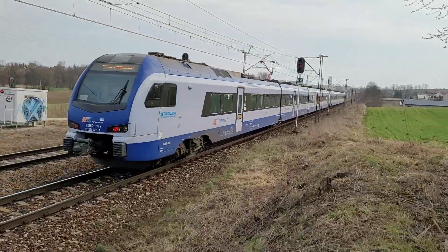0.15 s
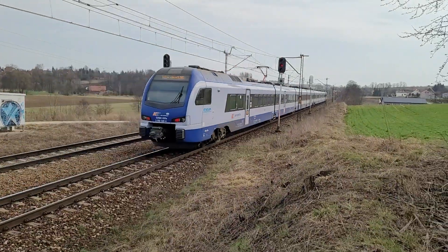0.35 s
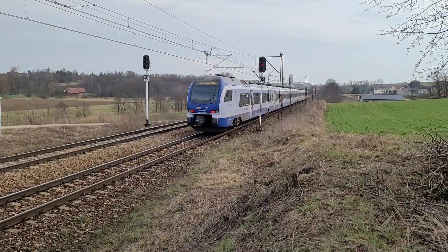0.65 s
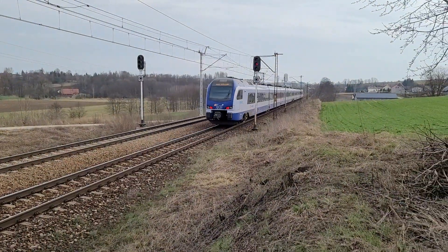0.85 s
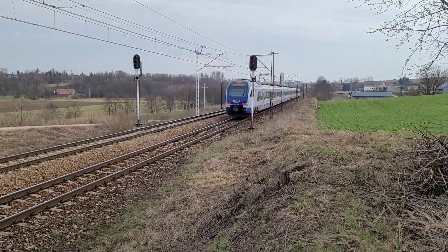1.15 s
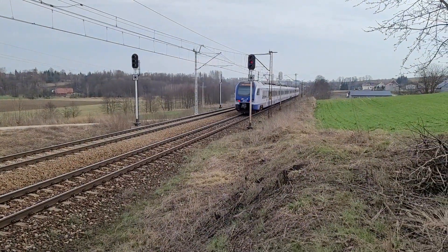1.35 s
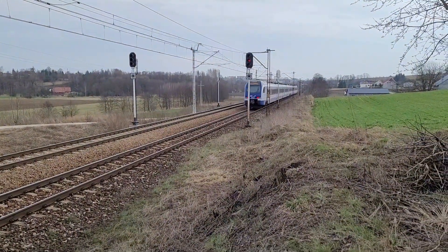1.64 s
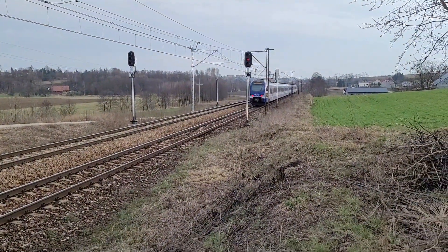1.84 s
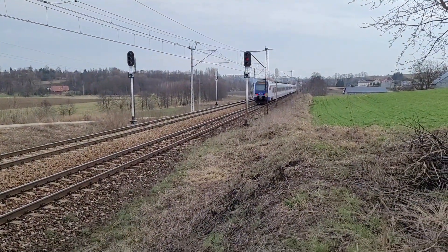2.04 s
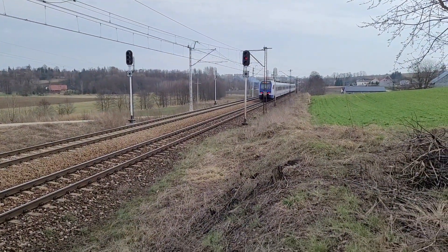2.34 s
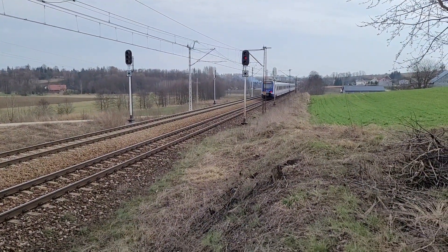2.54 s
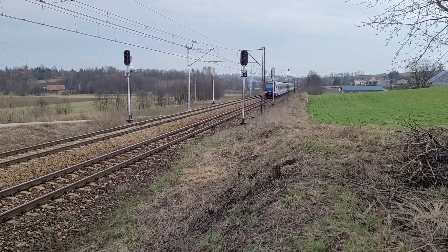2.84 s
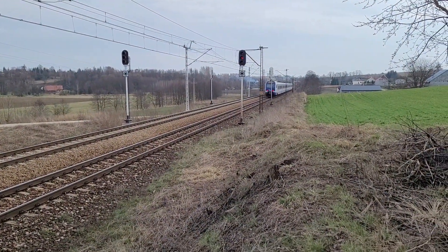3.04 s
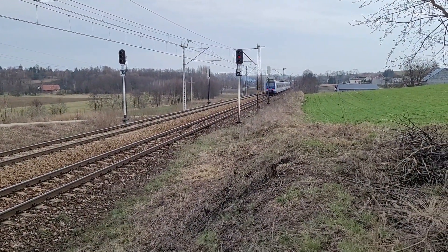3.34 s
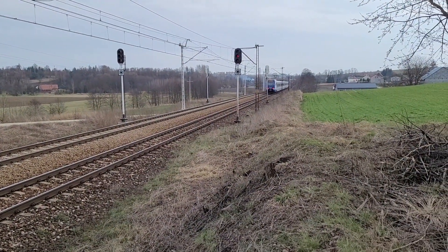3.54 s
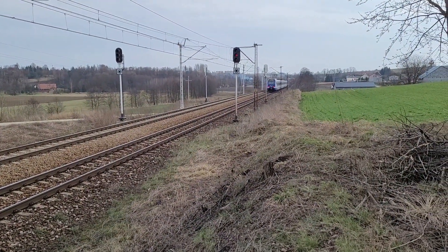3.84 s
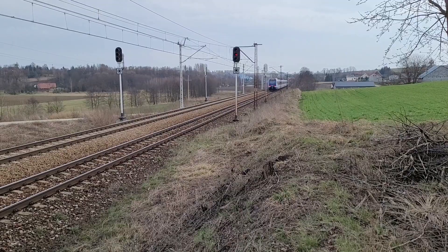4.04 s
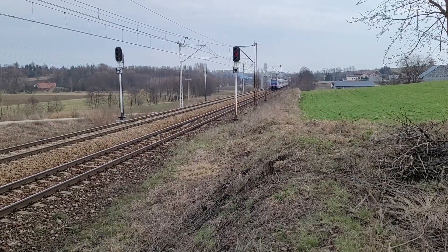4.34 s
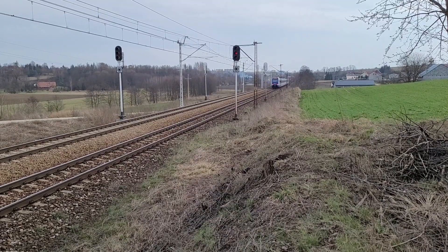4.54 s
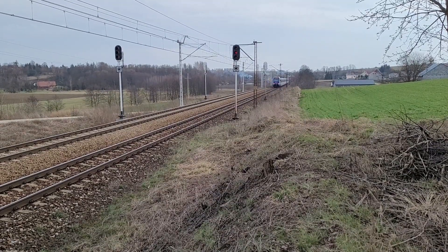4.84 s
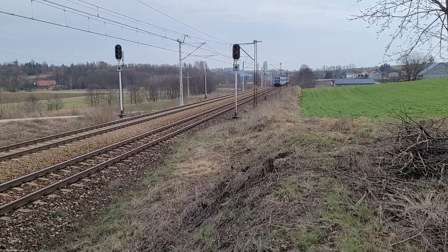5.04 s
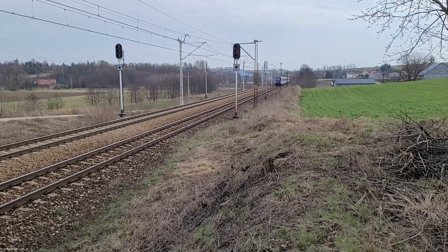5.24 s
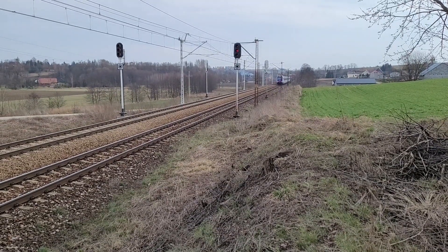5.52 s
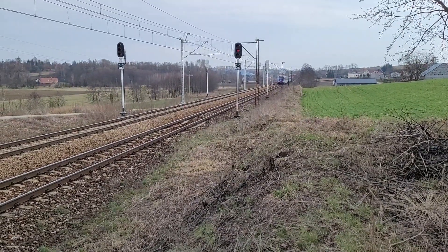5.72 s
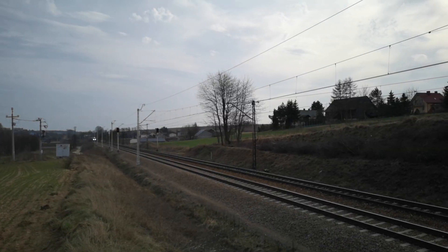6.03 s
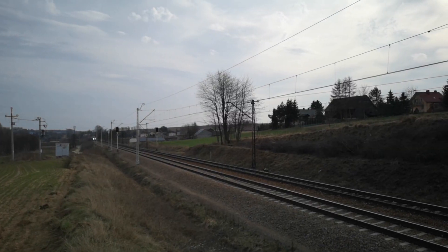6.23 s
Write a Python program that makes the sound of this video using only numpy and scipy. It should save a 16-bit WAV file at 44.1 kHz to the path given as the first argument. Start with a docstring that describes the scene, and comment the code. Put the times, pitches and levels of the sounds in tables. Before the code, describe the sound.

Loud rail roar, metallic wheel hum and airy rush open the scene and shrink into the distance over thin hiss. Low, lumpy gusts and sharp puffs buffet an unprotected hand-held microphone, jumping between sides. After one violent thump the level drops; smaller flutters and a soft far-off drone remain. The sound breaks off, then returns briefly in a windier open spot.

```python
"""Rails hum, wheels ring and air rushes as an electric train that has just passed rolls away over open fields:
bands of noise that fade, over a background hiss. Gusts thump on the two ports of a hand-held microphone, each
port largely on its own: noise bursts and single puffs. After the strongest gust all is quieter and a faint
distant drone grows; near the end the sound breaks off and comes back in another, windier spot."""
import sys
import numpy as np
from scipy import signal
from scipy.fft import rfft, irfft
from scipy.io import wavfile
from scipy.ndimage import uniform_filter1d

SR = 44100
rng = np.random.default_rng(int(sys.argv[2]) if len(sys.argv) > 2 else 0)


def unload_wav(signal):
    """Save mono or channel-first audio to the path in sys.argv[1] as 16-bit WAV at rate SR, clipped to [-1, 1]."""
    wavfile.write(
        sys.argv[1],
        SR,
        np.round(np.clip(np.atleast_2d(signal).T, -1, 1) * 32767).astype(np.int16),
    )


N = 281358

# Spectra of the three train roars, relative density: f/Hz, level/dB
RAIL_SPECTRUM = [(190, -37.5), (330, -16), (471, -10), (560, -9.5), (688, -2.5), (827, -6.5), (981, -0.5),
                 (1180, -10.5), (1500, -14), (1950, -39.5), (3300, -120)]
WHEEL_SPECTRUM = [(710, -50.5), (1200, -11.5), (1710, 1), (1910, 4), (2130, -1.5), (2580, -3.5),
                  (2720, -10), (4160, -35), (7040, -120)]
RUSH_SPECTRUM = [(1650, -19), (2700, -6.5), (3000, -6.5), (3400, -6.5), (4560, -3), (5240, -3),
                 (6180, -13.5), (8350, -9), (9180, -18.5), (12000, -23), (15600, -31)]
# Background hiss of field and microphone, coloured by the microphone, relative density: f/Hz, level/dB
HISS_SPECTRUM = [(2900, -11), (3400, -5.5), (5200, -6.5), (5750, -4), (6150, -21.5), (6620, -1), (7200, -2),
                 (7500, -19.5), (9300, -9), (9600, -4), (11000, -10), (12000, -6.5), (13200, -19),
                 (14300, -16), (14900, -29), (15600, -28.5)]
# Rail, wheel, air rush, background hiss: first level/dB, loss per doubling of distance/dB, lingering level/dB
FADES = [(-28.5, 7.5, -45), (-32.5, 14, -51.5), (-38.5, 10.5, -76), (-50, 4.5, -58)]
# Wavering of rail and wheel together: t/s, level change/dB
ROAR_WAVERS = [(0, -0.5), (.26, 1.5), (.4, 1), (1.2, 1.5), (2, -1), (2.6, -0.5), (3.2, -0.8), (3.85, 1),
               (4.1, -1.5), (4.6, -2.5), (5.75, -0.5)]
# Narrow resonances of rails and wheels: f/Hz, full width at half amplitude/Hz,
# level over the rail fade when near/dB, the same when far/dB
RINGS = [(355, 58, -5, -31), (467, 74, -6, -13), (692, 70, -3, -8.5), (918, 91, -6.5, -8),
         (1027, 150, -8.5, 0.5), (1303, 230, -10, -4), (1471, 90, -9, -15.5), (1877, 230, -10.5, -25),
         (2400, 310, -14.5, -26.5)]
# Likeness of the two channels: f/Hz, power share common to both (0-1), left minus right/dB,
# the same after the strongest gust/dB
CHANNELS = [(515, 0.82, 4.5, 1), (694, 0.83, -0.5, -1.5), (895, 0.86, 1, 1.5), (990, 0.8, 1.5, 0),
            (1310, 0.59, 6.5, 3), (1558, .35, 2, -1), (2176, 0.58, 3, 0.5), (3650, 0.26, 2.5, 2),
            (7300, 0.1, 1, 0.5), (7930, 0, 9, 6), (11430, 0.12, 10, 7), (12800, .7, 7.5, 11)]
# Phase between the channels, nearly alike again at the top: f/Hz, lead of the left/rad
LEFT_LEADS = [(0, 0), (430, 1.0), (600, .6), (690, .9), (1030, 2.9), (1400, 2.9), (2070, 6.3), (2700, 6.6),
              (3800, 12.4), (4300, 11.8), (5500, 14.4), (7000, 4 * np.pi), (16000, 4 * np.pi)]
# Steady wind under the gusts: t/s, left thud level/dB, right thud level/dB, flutter over thud/dB
BREEZE = [(0, -29, -35, -5), (.5, -36.5, -28, -7.5), (1.0, -32, -31, -4.5), (1.75, -40, -24, -7.5),
          (1.9, -44.5, -40, -20), (3.05, -40.5, -39.5, -12.5), (3.45, -31, -42, -4.5),
          (3.8, -43.5, -48, -11), (4.3, -50, -47.5, -3.5), (5.75, -46, -48, -8)]
# Gusts: t of top/s, length/s, thud level of the louder port at the top/dB, left minus right/dB, flutter over thud/dB
GUSTS = [(0.22, 0.27, -19.5, 7, -1.5), (0.524, 0.071, -33, -15, -2), (0.652, 0.14, -21, -25, -3.5),
         (0.704, 0.14, -20, -8.5, 1), (0.768, 0.081, -11.5, -21, -4), (0.853, 0.14, -19.5, -14, 2),
         (1.132, 0.11, -20.5, 3.5, -3), (1.406, 0.12, -25.5, 19, -27), (1.783, 0.16, -28.5, -27, 3),
         (1.976, 0.084, -32, 18, -6), (2.089, 0.069, -27, 24, -7.5), (2.429, 0.14, -25.5, -7, -4),
         (2.768, 0.027, -33, -8, -4), (2.87, 0.041, -30, -17, -15), (3.176, 0.066, -23, 30, 2),
         (3.25, 0.087, -17.5, 29, -5), (3.341, 0.2, -14.5, 24, -2.5), (3.369, 0.085, -20.5, 2, 4),
         (3.494, 0.098, -28.5, -19, -6), (3.575, 0.053, -42, 0, 12.5), (3.636, 0.12, -33, -3, -3.5),
         (4.256, 0.11, -38, 1, -21), (4.38, 0.13, -30.5, 6, -2.5), (4.506, 0.32, -39, 0, -3.5),
         (4.607, 0.16, -37.5, 4, -6.5), (4.776, 0.19, -35.5, 26, -3.5), (4.97, 0.14, -26, 4.5, -1),
         (5.165, 0.13, -29, 4.5, 0), (5.262, 0.11, -34.5, -24, -8.5), (5.437, 0.06, -36, -1, -3),
         (5.513, 0.17, -33, 12, 1), (5.687, 0.21, -36.5, 9, 6.5), (5.73, 0.093, -31, 6, 2.5)]
# Brief dips of the wind (a negative drop is a rise): t of middle/s, length/s, left drop/dB, right drop/dB
LULLS = [(0.812, 0.031, 8, 10.5), (4.08, 0.094, 27, -2.5), (4.782, 0.3, -5, 14), (5.384, 0.074, 6, 36)]
# Spectra of the wind on a port, relative density: f/Hz, level/dB; the flutter's f is scaled in each spot
THUD_SPECTRUM = [(12, -44), (22, -15.5), (43, 5.5), (64, 10), (135, -1.5), (176, -11.5), (200, -20),
                 (260, -44), (440, -120)]
FLUTTER_SPECTRUM = [(70, -44), (130, 4), (200, -4), (260, 0), (330, -6), (430, -12.5), (800, -29),
                    (1100, -51), (1800, -120)]
# Single strong puffs: t/s, peak level of the louder port before the push/dB, mean pitch f/Hz,
# left minus right/dB, push on the membrane (signed factor: in positive, out negative)
PUFFS = [(0.081, -10, 120, -13, -1.4), (0.14, -18, 150, 27, 0.72), (0.194, -13, 147, 20, 0.88),
         (0.236, -18, 150, -16, 1), (0.61, -9, 100, -27, 0.89), (0.732, -11, 99, -9, 0.87),
         (0.753, -15, 90, -25, -0.82), (0.85, -12, 80, -13, 0.96), (0.984, -16, 199, 10, 1),
         (1.135, -10.5, 71, -5, 1), (1.27, -20, 90, -25, -0.77), (2.435, -16, 110, -20, -1.2),
         (3.171, -14, 133, 34, 1), (3.248, -18, 110, 34, 1), (3.281, -11, 132, 23, 1),
         (3.3, -15, 110, -25, -1), (3.312, -6, 151, 24, 0.93), (3.327, -12, 129, -8, 0.94),
         (3.351, 0.5, 149.3, 22, 0.6), (3.367, -12, 220, -19.5, -1.1), (3.372, -7.5, 150, -15, 0.96),
         (3.391, -2.5, 180, 24, 0.93), (3.434, -13.5, 85, 30, -0.95), (3.871, -29, 170, 1.5, -1.06),
         (3.911, -31, 90, -1, -1), (3.997, -27, 71, -3, -0.96), (4.764, -23, 78, 29, 0.69),
         (4.793, -28, 126, 24, -0.95), (4.968, -21.5, 116, -2, -0.9), (4.993, -26, 142, 19, -1),
         (5.15, -24.5, 254, 4, -1.16), (5.173, -22, 99, 25, -1.16), (5.593, -23, 146, -3, 1),
         (5.682, -21.5, 253, -10, -1.1), (5.702, -24, 230, -15, -1), (5.743, -23, 130, 25.5, 0.74),
         (5.744, -23, 147, -26, -1), (6.266, -13, 54.4, 3, -1), (6.295, -13.5, 200, 9, 1),
         (6.321, -12.5, 182, 13, -1.04), (6.354, -12, 147.8, 5, 1)]
# Distant drone, relative density: f/Hz, level/dB
DRONE_SPECTRUM = [(380, -28.5), (520, -5.5), (700, 1), (880, -2), (1100, -8.5), (1550, -16.5),
                  (2100, -16.5), (2900, -29.5), (4200, -49)]
# Growth of the drone: t/s, level/dB
DRONE_LEVEL = [(3.3, -64), (4.3, -55), (4.85, -49), (5.15, -45), (5.75, -46)]
# Wind in the second spot, alike on both ports: t/s, thud level/dB, flutter level/dB
WIND_AFTER = [(6.2, -25, -35), (6.23, -23, -32), (6.264, -22.5, -39), (6.29, -22.5, -23), (6.33, -18, -25),
              (6.38, -34.5, -34)]
# Field noise of the second spot, relative density: f/Hz, level/dB
FIELD_SPECTRUM = [(450, -32), (700, 6), (1100, 5), (1700, 4.5), (2600, -7.5), (4000, -22), (8000, -25.5),
                  (15500, -31)]

DOUBLING_S = 1.0  # time the train takes to double its first distance
FAR_S = 1.82  # time over which the balance of rings and rail roar turns from near to far
RING_WANDER, RING_WANDER_HZ = 0.015, 3.0  # rms stray as a share of pitch; corner of its slow noise
TURN_DOWN_S, TURN_DOWN_DB = (3.27, 3.54), 6  # the level is turned down between these times, by this much
GUST_EDGE_DB, GUST_RISE = 17, 0.55  # fall from top to either end; share of the length spent rising
LULL_EDGE_S = 0.023
PUFF_SLOWING = 1.83  # the swing after the snap is this many times slower than the one before
DRONE_SHARE = 0.94  # power share common to both ports
BREAK_S = (5.75, 6.195)  # silence from, to
FIELD_DB = -55
CUTOFF_HZ, CEILING = 15720, 0.95  # top of the passband; amplitude the membrane cannot exceed


def from_db(db):
    """Level as amplitude gain: 20 dB are a factor of ten."""
    return 10 ** (np.asarray(db) / 20)


def rms_one(x):
    """Normalization to unit rms, the reference of every noise level."""
    return x / np.sqrt(np.mean(x ** 2) + 1e-20)


def in_time(rows):
    """Linear interpolation of a table's columns, one value per sample."""
    s, *columns = np.transpose(rows)
    t = np.arange(N) / SR
    return [np.interp(t, s, column) for column in columns]


def at_hz(points, column=1):
    """Interpolation along log frequency, one value per bin."""
    hz = np.maximum(np.fft.rfftfreq(N, 1 / SR), 1)
    table = np.array(points)
    return np.interp(np.log(hz), np.log(table[:, 0]), table[:, column])


def drift(corner_hz):
    """Random modulation of unit rms: white noise through two equal low-pass poles."""
    step = 40  # samples between slow values
    pole = np.exp(-2 * np.pi * corner_hz * step / SR)
    white = rng.standard_normal(N // step + 2002)
    slow = signal.lfilter([1], [1, -2 * pole, pole * pole], white)[2000:]
    return np.interp(np.arange(N) / step, np.arange(len(slow)), rms_one(slow))


def coloured(bins, spectrum):
    """Spectral shaping: noise bins weighted by a spectrum, returned at unit rms."""
    return rms_one(irfft(bins * from_db(at_hz(spectrum)), N))


def shared(common, own, share):
    """Partial coherence: powers of common and own noise add up to a constant."""
    return np.sqrt(share) * common + np.sqrt(1 - share) * own


def channel_noise():
    """Coherence by frequency: a common part, phase-shifted in the right channel, plus noise of each channel's own."""
    common, left, right = rfft(rng.standard_normal((3, N)))
    share = np.clip(at_hz(CHANNELS), 0, 1)
    lead = np.interp(np.fft.rfftfreq(N, 1 / SR), *np.transpose(LEFT_LEADS))
    lean = from_db(at_hz(CHANNELS, column=2) / 2)
    return np.array([shared(common, left, share) * lean,
                     shared(common * np.exp(-1j * lead), right, share) / lean])


def fading():
    """Spreading loss: levels fall per doubling of distance to what lingers; later all four are turned down."""
    t = np.arange(N) / SR
    doublings = np.log2(1 + t / DOUBLING_S)
    turn_down_db = np.interp(t, TURN_DOWN_S, [0, -TURN_DOWN_DB])
    levels = []
    for first_db, loss_db, linger_db in FADES:
        power = from_db(2 * (first_db - loss_db * doublings)) + from_db(2 * linger_db)
        levels.append(10 * np.log10(power) + turn_down_db)
    return levels


def rings(rail_db, swell_db, far):
    """Resonance: narrow bands of noise with steep skirts, each straying in pitch as it is read faster or slower."""
    hz, noise = np.fft.rfftfreq(N, 1 / SR), channel_noise()
    out = np.zeros((2, N))
    for centre_hz, width_hz, near_db, far_db in RINGS:
        band = rms_one(irfft(noise / (1 + (2 * (hz - centre_hz) / width_hz) ** 4), N))
        read = np.arange(N) + np.cumsum(RING_WANDER * drift(RING_WANDER_HZ))
        band = np.array([np.interp(read, np.arange(N), port, period=N) for port in band])
        over_db = near_db + far * (far_db - near_db)
        out += from_db(rail_db + over_db + swell_db + 2.3 * drift(7.3)) * band
    return out


def train_and_hiss():
    """Superposition of three train roars, a background hiss and the rings, all swelling together."""
    rail_db, wheel_db, rush_db, hiss_db = fading()
    waver_db, = in_time(ROAR_WAVERS)
    rail_db, wheel_db = rail_db + waver_db, wheel_db + waver_db
    far = np.clip(np.arange(N) / SR / FAR_S, 0, 1)
    swell_db, noise = 0.56 * drift(21), channel_noise()
    roar_db = rail_db + 4.0 - 1.9 * far  # far off the rings stand out
    out = from_db(roar_db + swell_db + 1.32 * drift(41)) * coloured(noise, RAIL_SPECTRUM)
    out += from_db(wheel_db + swell_db + 1.0 * drift(7.7)) * coloured(noise, WHEEL_SPECTRUM)
    out += from_db(rush_db + swell_db + 0.51 * drift(11)) * coloured(noise, RUSH_SPECTRUM)
    out += from_db(hiss_db + swell_db + 0.63 * drift(12)) * coloured(channel_noise(), HISS_SPECTRUM)
    return out + rings(rail_db, swell_db, far)


def shift_balance(x):
    """Level difference between channels: it crossfades to its second value while the level is turned down."""
    turn = from_db((at_hz(CHANNELS, column=3) - at_hz(CHANNELS, column=2)) / 2)
    turned = np.interp(np.arange(N) / SR, TURN_DOWN_S, [0, 1])
    return (1 - turned) * x + turned * irfft(rfft(x) * [turn, 1 / turn], N)


def gusts():
    """Addition of powers: breeze plus gusts that rise and fall linearly in dB; lulls cut in. Levels for both ports."""
    t = np.arange(N) / SR
    left_db, right_db, over_db = in_time(BREEZE)
    thud = from_db(2 * np.array([left_db, right_db]))
    flutter = thud * from_db(2 * over_db)
    for s, length, thud_db, lean_db, flutter_db in GUSTS:
        i = np.arange(max(round((s - 2 * length) * SR), 0), round((s + 2 * length) * SR))
        before, after = (s - i / SR) / GUST_RISE, (i / SR - s) / (1 - GUST_RISE)
        away = np.maximum(before, after) / length  # 0 at the top, 1 at either end
        port_db = thud_db + np.minimum([[lean_db], [-lean_db]], 0)
        power = from_db(2 * (port_db - GUST_EDGE_DB * away))
        thud[:, i] += power
        flutter[:, i] += power * from_db(2 * flutter_db)
    drop_db = np.zeros((2, N))
    for s, length, *drops_db in LULLS:
        depth = np.clip((length / 2 - abs(t - s)) / LULL_EDGE_S + 0.5, 0, 1)
        drop_db += np.outer(drops_db, depth)
    return zip(10 * np.log10(thud) - drop_db, 10 * np.log10(flutter) - drop_db)


def wind(ports, thud_share, knock_share, lag_s, sharper):
    """Turbulent pressure: eddies hit each port as a deep lumpy thud and a flutter of uneven knocks over some noise."""
    knocks = (rng.random((3, N)) < 160.0 / SR).astype(float)  # 160 a second on average
    knocks *= from_db(3.4 * np.minimum(rng.exponential(1, (3, N)), 4))
    knocks = knocks * rng.choice([-1, 1], (3, N)) + 0.028 * rng.standard_normal((3, N))
    swirls = rng.standard_normal((3, N))
    out = []
    for k, (thud_db, flutter_db) in enumerate(ports):
        thud = coloured(rfft(shared(swirls[2], swirls[k], thud_share)), THUD_SPECTRUM)
        # evened out, so that the gusts set the swells, not chance
        thud = rms_one(thud / np.sqrt(uniform_filter1d(thud ** 2, size=3000) + 0.098))
        common = np.roll(knocks[2], round(k * lag_s * SR))  # later at the right port
        flutter = rfft(shared(common, knocks[k], knock_share))
        flutter = coloured(flutter, np.array(FLUTTER_SPECTRUM) * [sharper, 1])
        out.append(from_db(thud_db + 3.45 * drift(11.0)) * thud + from_db(flutter_db) * flutter)
    return np.array(out)


def puffs():
    """Impulse response of the membrane: a snap between a quick swing before and a slower one after."""
    half = 1000  # samples on each side of the snap
    out, u = np.zeros((2, N + 2 * half)), np.arange(-half, half) / SR
    u = np.where(u > 0, u / PUFF_SLOWING, u)
    for s, peak_db, hz, lean_db, push in PUFFS:
        a = (np.pi * hz * u * np.sqrt(PUFF_SLOWING)) ** 2
        gains = push * from_db(peak_db + np.minimum([lean_db, -lean_db], 0))
        middle = round(s * SR)
        out[:, middle - half:middle + half] += np.outer(gains, (2 * a - 1) * np.exp(-a))
    return out[:, :N]


def drone():
    """High coherence, as from straight ahead: broad noise mostly common to both ports, wavering a little."""
    common, *own = rng.standard_normal((3, N))
    level_db, = in_time(DRONE_LEVEL)
    noise = shared(common, np.array(own), DRONE_SHARE)
    return from_db(level_db + 1.5 * drift(8.3)) * coloured(rfft(noise), DRONE_SPECTRUM)


def field():
    """Diffuse background: steady noise, independent at each port."""
    return from_db(FIELD_DB) * coloured(rfft(rng.standard_normal((2, N))), FIELD_SPECTRUM)


def scene():
    """Succession of two sound fields: the line side, a silence, then the windier spot."""
    t = np.arange(N) / SR
    before = np.clip((BREAK_S[0] - t) / 0.005, 0, 1)
    after = np.clip((t - BREAK_S[1]) / 0.00274, 0, 1)
    line_side = shift_balance(train_and_hiss()) + drone()
    line_side += wind(gusts(), thud_share=0.16, knock_share=0.033, lag_s=0, sharper=0.95)
    windier = wind(2 * [in_time(WIND_AFTER)], thud_share=0.88, knock_share=0.91, lag_s=0.00091, sharper=1.24)
    return before * line_side + after * (windier + field()) + puffs()


def record(dry):
    """Saturation and band limiting: the membrane rounds the strongest puffs, then a steep low-pass cuts the top."""
    rounded = CEILING * np.tanh(dry / CEILING)
    run_in = rounded[:, 500:0:-1]  # the opening played backwards settles the filter
    low_pass = signal.ellip(12, 0.5, 70, CUTOFF_HZ, fs=SR, output="sos")
    return signal.sosfilt(low_pass, np.concatenate([run_in, rounded], axis=1))[:, 500:]


dry = scene()
out = record(dry)
unload_wav(out)
```